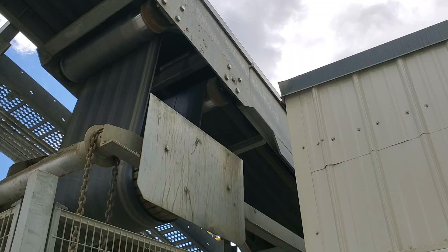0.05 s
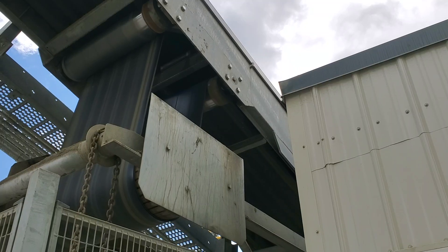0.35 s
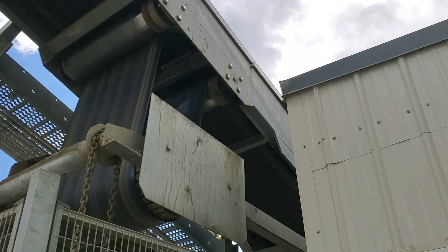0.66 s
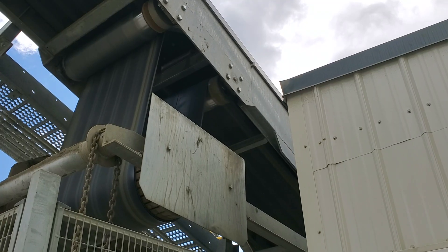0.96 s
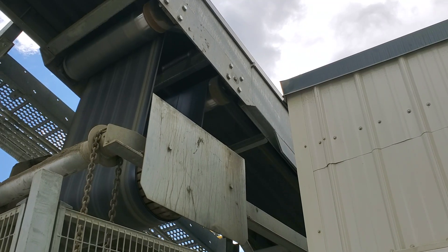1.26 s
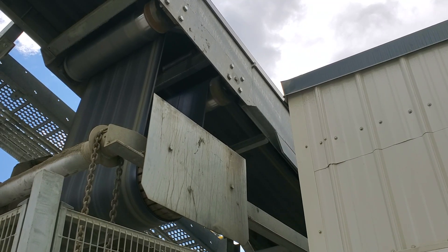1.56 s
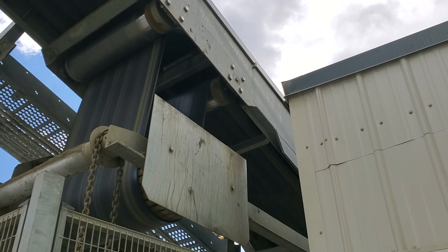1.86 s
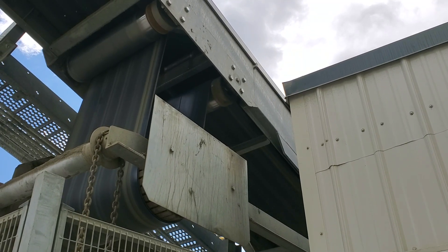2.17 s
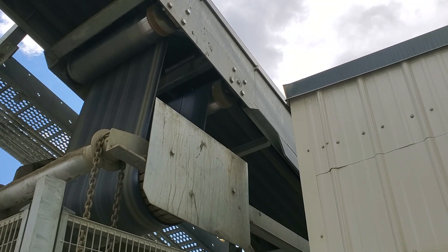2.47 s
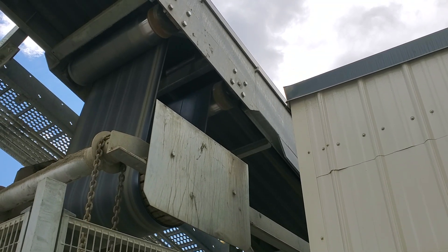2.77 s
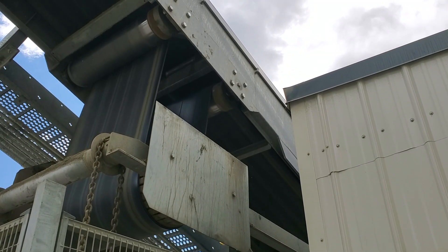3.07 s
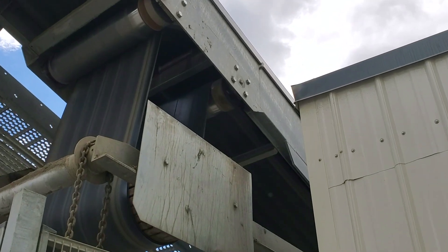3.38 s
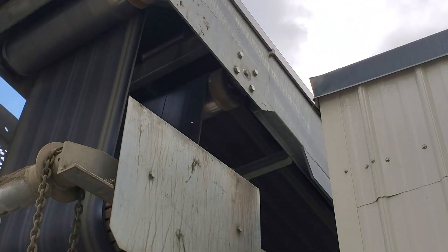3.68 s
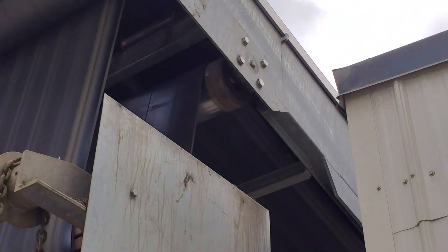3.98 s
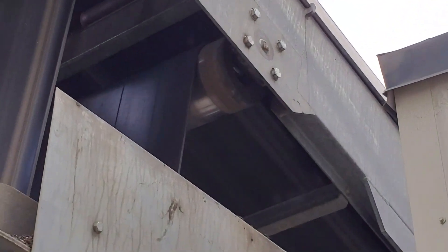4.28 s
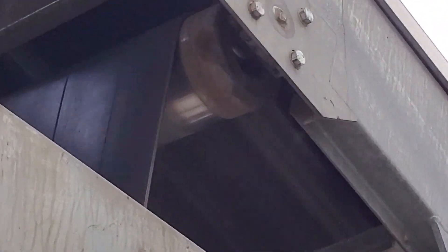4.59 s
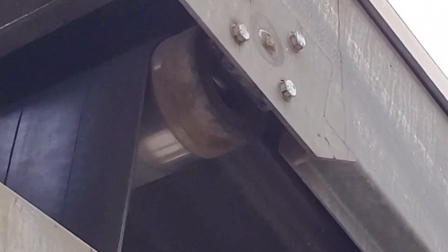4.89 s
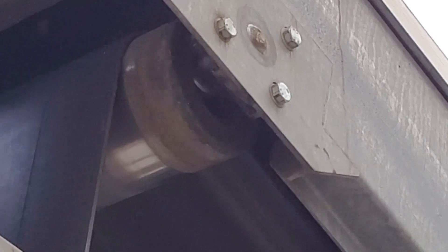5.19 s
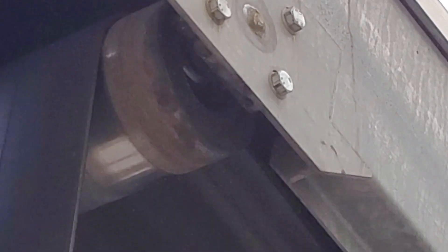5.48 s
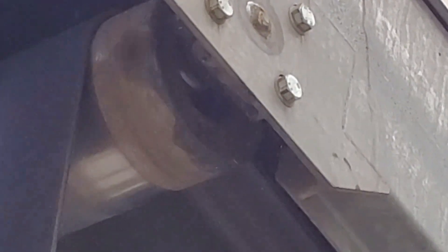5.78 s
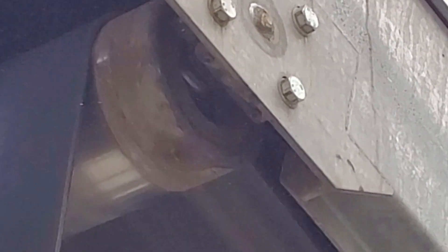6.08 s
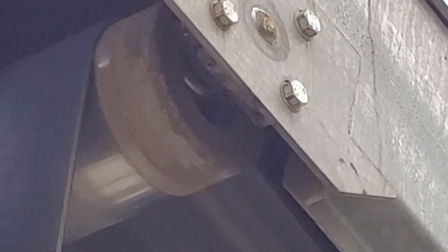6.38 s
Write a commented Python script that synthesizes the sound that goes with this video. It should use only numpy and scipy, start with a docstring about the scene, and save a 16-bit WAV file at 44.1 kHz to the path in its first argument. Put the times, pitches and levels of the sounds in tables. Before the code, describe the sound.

A belt conveyor runs outdoors, heard from below its steel frame for about six and a half seconds. The rolling belt makes a steady low rumble, and a loose shaft adds a deep, uneven throb. Over this, a worn pulley bearing knocks in a quick repeating pattern, making the steelwork rattle and ring. The machine is a little softer during the first second, then builds, with harder knocks around 1.6 to 3 seconds and again from about 4 to 5.4 seconds. A short, bright hiss swells at 2.2 seconds and fades by about 2.7. The dry bearing gives faint, very short high squeaks near 0.7 seconds, between 1.4 and 1.8, at 4.2, and from 5.4 to 5.8. A slight rasp and a thin, high drive whine stay in the background. The rumbling and rattling continue to the end.

```python
"""Outdoors, below the steel frame of a belt conveyor that runs on a worn pulley bearing.
The loose shaft throbs in the frame's low resonance, and four worn spots knock in every turn,
exciting the modes of the steelwork. The dry bearing chirps by stick-slip friction and rasps
faintly. Behind it the belt rolls, the drive whines, and one short gush of hiss passes."""
import sys
import numpy as np
from scipy import signal
from scipy.fft import rfft, irfft
from scipy.io import wavfile

SR = 44100
rng = np.random.default_rng(int(sys.argv[2]) if len(sys.argv) > 2 else 0)


def materialize(psi):
    """Save the field psi as 16-bit PCM at rate SR to the path in sys.argv[1].

    A 1-D psi becomes a single channel; in a 2-D psi each row is a channel.
    """
    bounded = np.clip(np.atleast_2d(psi).T, -1, 1)
    quanta = np.round(bounded * 32767).astype(np.int16)
    wavfile.write(sys.argv[1], SR, quanta)


N = 284004
T = np.arange(N) / SR
HZ = np.fft.rfftfreq(N, 1 / SR)
TURN_HZ = 3.365  # rotation rate of the pulley

# load on the belt: time_s, gain_db
BELT_LOAD = [(0, -1.5), (.25, -8), (.68, -8), (1, -4.5), (1.12, -0.5), (1.35, 0.5), (1.7, 1.5), (2.05, 0.5),
             (2.4, 0), (2.7, .5), (3.2, -0.5), (3.6, 1.9), (3.87, -.5), (4.2, 2), (4.9, 0.1), (5.3, 1.5),
             (5.75, -1.2), (6.44, 1.9)]
# spectrum of the rolling belt and idlers: frequency_hz, density_db
BELT_SPECTRUM = [(20, -25), (45, 0.5), (65, -4.5), (88, 8.5), (125, 9.5), (160, 3.5), (270, -1.5),
                 (600, -6), (1400, -14), (4000, -18.5), (5700, -23), (6800, -19), (7900, -30),
                 (12500, -26.5), (16000, -37)]
# envelope of the gush: time_s, level_db
GUSH_ENVELOPE = [(2.19, -85), (2.198, -29), (2.26, -28.5), (2.31, -22.5), (2.38, -20), (2.5, -26),
                 (2.6, -32.5), (2.9, -85)]
# spectrum of the gush: frequency_hz, density_db
GUSH_SPECTRUM = [(1000, -14), (3000, -8), (4800, -3.5), (6700, -0.5), (8000, -9), (12500, -9.5),
                 (14000, -17), (16000, -23)]
# the two tones of the drive: pitch_hz
WHINE_TONES = (3865, 4134)
# scraping of the dry bearing: time_s, relative_level_db, pitch_hz
RASP_TRACK = [(0, -68, 5060), (.9, -69, 5180), (1.6, -51, 5220), (2.2, -41, 4950), (3.2, -50, 5164),
              (3.7, -45, 5100), (4.8, -55, 4996), (5.75, -39.5, 4845), (6.1, -58, 4907)]
# chirps of the dry bearing: start_s, length_s, pitch_hz, relative_level_db
BEARING_SQUEAKS = [(0.637, .028, 5140, -41), (.691, 0.024, 5100, -33), (.72, .055, 5120, -40),
                   (1.415, .047, 5120, -36), (1.516, 0.033, 5180, -30), (1.785, .033, 5035, -28),
                   (4.164, 0.023, 4860, -22.5), (5.355, 0.031, 4860, -29), (5.378, 0.068, 5000, -38),
                   (5.722, 0.029, 4805, -26.5), (5.813, .035, 4920, -26)]
# big heaves of the shaft against the frame: peak_s, relative_level_db, pitch_hz
SHAFT_HEAVES = [(0.219, -24, 114), (.495, -16, 109.5), (1.1, -18.5, 114), (1.339, -16.5, 123.8),
                (1.503, -16.5, 102.6), (1.654, -10.5, 119.5), (1.726, -10.5, 118.2), (1.921, -13, 107),
                (2.308, -12, 108), (2.401, -5.5, 116), (2.488, -7.5, 113.9), (2.66, -15.5, 101.5),
                (3.139, -13, 109.1), (3.467, -8.5, 110.8), (3.601, -7.5, 114.5), (3.666, -17, 115.8),
                (3.887, -10, 115.9), (4.21, -12.5, 119.7), (4.29, -17.5, 109.6), (4.367, -10.5, 108.5),
                (4.785, -6, 111.6), (4.847, -10.5, 114.6), (5.088, -10.5, 110), (5.205, -8.5, 111.4),
                (5.4, -9.5, 116.4), (5.976, -8.5, 111.1), (6.242, -12.5, 110), (6.386, -8.5, 116.6)]
# resonances of the frame, standing on its broad response: frequency_hz, width_hz, height_db
FRAME_MODES = [(225.6, 4.15, 8.5), (356.4, 8.3, 9.5), (411.9, 12, 6.5), (460, 15.8, 12),
               (580.3, 32.7, 14.5), (647.6, 8.2, 13), (732, 30, 4), (879, 9.3, 16), (928, 26, 11.5),
               (1046, 32, 5), (1167, 24.4, 18.5), (1239, 96, 8), (1884, 14.3, 12.5), (1950, 92, 6),
               (2433, 67, 15), (3134, 113, 11), (3406, 95, 10.5), (4800, 120, 2)]
# broad response of the frame: frequency_hz, gain_db
FRAME_SLOPE = [(60, -25.5), (150, 2.5), (250, -4), (500, -1), (700, -4), (790, -9), (1050, -4),
               (1400, -14.5), (1800, -10), (2700, -18), (3900, -16.5), (5700, -20.5), (6800, -18.5),
               (7900, -34.5), (12500, -29), (16000, -48)]
# the frame's low (thud), middle (ring) and high (clang) bands of modes:
# low_hz, high_hz, idle_db, trim_db, blows_per_s, t60_s, decay_ratio
MODE_BANDS = [(128, 780, -26.5, 0, 1200, 0.062, 1), (894, 1465, -39, -2, 1000, 0.05, 0.89),
              (1450, 13000, -44, 2.1, 1000, 0.058, 0.96)]
# worn spots, before the load acts: offset_in_turn_s, thud_db, ring_db, clang_db, rise_s, decay_s
WORN_SPOTS = [(.067, -28.5, -23, -29, 0.013, 0.038), (0.12, -20, -24.5, -27.5, 0.022, 0.042),
              (.197, -16.5, -22.5, -26.5, 0.019, 0.047), (.294, -21.5, -28, -29, .024, .044)]
# hard knocks, each replacing the ordinary one near it: time_s, thud_db, ring_db, clang_db
HEAVY_KNOCKS = [(.2, -27, -21.5, -28.5), (.364, -23, -28, -29), (0.422, -25, -21, -29),
                (0.889, -22, -22.5, -31.5), (1.298, -20, -17, -21.5), (1.548, -29, -16, -21.5),
                (1.609, -10.5, -14.5, -17.5), (1.691, -11.5, -17, -19.5), (1.787, -12, -19, -22),
                (1.855, -26, -16.5, -25.5), (2.2, -16.5, -18.5, -22), (2.279, -15.5, -20.5, -22),
                (2.385, -17, -17, -24.5), (2.487, -15, -19.5, -21.5), (2.579, -11.5, -22, -20),
                (2.738, -20, -15.5, -26), (2.796, -17, -14, -18.5), (2.978, -12, -22, -20),
                (3.27, -16.5, -18.5, -21.5), (3.681, -14, -29, -21), (3.924, -26, -13, -25),
                (3.983, -16, -13, -18), (4.167, -11, -16, -18), (4.23, -25, -35, -23),
                (4.363, -18.5, -14.5, -21.5), (4.453, -14.5, -16.5, -20.5), (4.576, -15.5, -20, -22),
                (4.656, -16.5, -14.5, -26), (4.76, -9, -19, -23), (4.871, -30, -18.5, -27),
                (5.055, -14, -18, -19), (5.12, -15.5, -12, -23.5), (5.174, -17, -10.5, -17.5),
                (5.25, -15, -17.5, -22), (5.353, -13.5, -22, -22), (5.835, -17, -18, -27),
                (5.94, -14.5, -19.5, -23), (6.242, -15, -14.5, -20), (6.303, -29, -18.5, -26),
                (6.363, -20.5, -16.5, -19.5)]
# coherence of left and right: frequency_hz, shared_power_ratio
COHERENCE = [(25, .93), (60, .985), (130, .985), (290, .87), (640, .76), (1400, .5), (3100, .38),
             (6800, .1), (15000, .05)]
# level difference between the sides: frequency_hz, left_minus_right_db
BALANCE = [(100, 0.69), (400, 0.22), (1200, 2.4), (2400, 2.1), (4400, 3.2), (8000, 3.2), (12000, 9.5),
           (16000, 11)]


def amp(db):
    """Amplitude grows tenfold for every 20 decibels."""
    return 10 ** (np.asarray(db) / 20)


def unit(x):
    """Normalisation to an rms of 1."""
    return x / np.sqrt(np.mean(x ** 2) + 1e-20)


def spectrum_at(points, hz):
    """Interpolation of a spectrum on a logarithmic frequency axis."""
    frequency, value = np.transpose(points)
    return np.interp(np.log(hz + 1), np.log(frequency + 1), value)


def curve(rows, column=1):
    """Linear interpolation of one column of a time table at every sample."""
    rows = np.array(rows)
    return np.interp(T, rows[:, 0], rows[:, column])


def add(mix, start_s, sound):
    """Superposition: a sound adds to the mix from start_s on."""
    part = mix[max(round(start_s * SR), 0):][:len(sound)]
    part += sound[:len(part)]


def wander(hz):
    """Random fluctuation: low-pass Gaussian noise of rms 1 and a bandwidth of about hz."""
    return unit(irfft(rfft(rng.standard_normal(N)) * np.exp(-(HZ / hz) ** 2), N))


def stereo_pair(spectra, hz):
    """Partial coherence: one shared and two independent spectra blend into left and right."""
    shared = np.clip(spectrum_at(COHERENCE, hz), 0, 1)
    return np.sqrt(shared) * spectra[0] + np.sqrt(1 - shared) * spectra[1:]


def noise(colour):
    """Spectral shaping: white noise is filtered into coloured stereo noise of rms 1."""
    white = stereo_pair(rfft(rng.standard_normal((3, N))), HZ)
    return unit(irfft(white * amp(spectrum_at(colour, HZ)), N))


def belt(load, level_db=-21, flutter_db=0.65):
    """Rolling noise: the belt crosses its idlers with a low roar and a fine hiss."""
    return amp(level_db + flutter_db * wander(21)) * load * noise(BELT_SPECTRUM)


def gush(flutter_db=0.2, pan_db=1):
    """Amplitude-modulated noise: a brief bright hiss swells and fades."""
    envelope = amp(curve(GUSH_ENVELOPE) - flutter_db * wander(54.6))
    return envelope * noise(GUSH_SPECTRUM) * amp([[-pan_db], [pan_db]])


def drive_whine(load, level_db=-46, drift_hz=1.27, flutter_db=3.5):
    """Tonal machine noise: two thin spectral lines from the motor drive grow with the load."""
    tones = 0
    for hz in WHINE_TONES:
        flutter = amp(flutter_db * wander(6))
        phase = 2 * np.pi * np.cumsum(hz + drift_hz * wander(9)) / SR
        tones += flutter * np.sin(phase)
    return amp(level_db) * load * tones


def bearing_rasp(level_db=1, drift_hz=50, width_hz=110, flutter_db=3):
    """Friction noise: scraping drives a high mode as a narrow band, without locking into a tone."""
    phase = 2 * np.pi * np.cumsum(curve(RASP_TRACK, column=2) + drift_hz * wander(14)) / SR
    scrape = wander(width_hz) * np.cos(phase) + wander(width_hz) * np.sin(phase)
    return amp(level_db + curve(RASP_TRACK) + flutter_db * wander(31.5)) * scrape


def bearing_squeaks(level_db=-1, sag_hz_per_s=2000, jitter=0.0083, echo_db=-9, echo_s=0.024):
    """Stick-slip excites the same high mode in unsteady, falling chirps; a wall reflects them."""
    out = np.zeros(N)
    waver = 1 + jitter * wander(250)
    for start_s, length_s, pitch_hz, db in BEARING_SQUEAKS:
        n = round(length_s * SR)
        hz = (pitch_hz - sag_hz_per_s * (T[:n] - length_s / 2)) * waver[round(start_s * SR):][:n]
        chirp = amp(db) * np.sqrt(2 * np.hanning(n)) * np.sin(2 * np.pi * np.cumsum(hz) / SR)
        add(out, start_s, chirp)
        add(out, start_s + echo_s, amp(echo_db) * chirp)
    return amp(level_db) * out


def shaft_throb(load, level_db=-5, idle_db=-20, idle_hz=109, swell_db=2, heave_s=0.0898,
                beat_depth=0.073, wobble=0.02763):
    """Forced resonance: each heave of the shaft swells the frame's low mode and pulls its pitch."""
    power = (load * amp(idle_db + swell_db * wander(11))) ** 2
    pull = np.zeros(N)
    heave = np.hanning(round(heave_s * SR)) ** 2
    for peak_s, db, hz in SHAFT_HEAVES:
        heave_power = amp(db) ** 2 * heave
        add(power, peak_s - heave_s / 2, heave_power)
        add(pull, peak_s - heave_s / 2, heave_power * (hz - idle_hz))
    pitch_hz = (idle_hz + pull / power) * (1 + wobble * wander(30))
    phase = 2 * np.pi * np.cumsum(pitch_hz) / SR
    swing = np.sin(phase) + beat_depth * wander(42) * np.cos(phase)
    return amp(level_db) * np.sqrt(2 * power) * swing


def frame_response():
    """Modal response of the steelwork: narrow resonances stand on a broad slope."""
    peaks = sum((amp(db) ** 2 - 1) / (1 + (2 * (HZ - hz) / width_hz) ** 2) ** 1.4
                for hz, width_hz, db in FRAME_MODES)
    log_gain = np.log(amp(spectrum_at(FRAME_SLOPE, HZ))) + np.log(np.maximum(1 + peaks, .1)) / 2
    # minimum phase, so that the ringing follows the blow
    cepstrum = irfft(log_gain, N)
    cepstrum[1:N // 2] *= 2
    cepstrum[N // 2 + 1:] = 0
    return np.exp(rfft(cepstrum))


def pathway(t60_s, direct=0.72):
    """Scattering: a direct arrival and a diffuse stereo tail smear a blow but hardly colour it."""
    t = T[:4096]
    arrivals = rng.standard_normal((3, len(t))) * amp(-60 * t / t60_s)
    arrivals /= np.linalg.norm(arrivals, axis=1, keepdims=True)
    arrivals[0, 0] += direct
    spectra = stereo_pair(rfft(arrivals), np.fft.rfftfreq(len(t), 1 / SR))
    flattened = spectra / abs(spectra) ** (2 / 3)
    paths = irfft(flattened) * (1 - t / t[-1])
    return paths / np.linalg.norm(paths, axis=1, keepdims=True)


def impact_spectrum(force, strikes, blows_per_s, t60_s, spread_db=2.5, shift_db=1.13, places=5):
    """Shot noise: tiny blows and hard strikes land at several places on the bearing, each with a path."""
    sizes = amp(spread_db * np.clip(rng.standard_normal(N), -2, 2)) * rng.choice([-1, 1], N)
    blows = force * unit(sizes * (rng.random(N) < blows_per_s / SR)) + strikes
    place = rng.integers(0, places, N)
    out = 0
    for k in range(places):
        shifts = amp(shift_db * rng.standard_normal(80))
        share = unit(np.interp(T, np.linspace(0, T[-1], 80), shifts))
        local_blows = blows * share * (place == k)
        out += signal.oaconvolve(local_blows[None], pathway(t60_s), axes=1)[:, :N]
    return rfft(out)


def knocks(near_s=.03):
    """Periodic impact: each worn spot knocks once a turn, scaled by the load or as a listed hard knock."""
    rows = []
    for turn in range(int(T[-1] * TURN_HZ) + 1):
        for offset_s, *levels_db, rise_s, decay_s in WORN_SPOTS:
            time_s = turn / TURN_HZ + offset_s
            loaded_db = np.array(levels_db) + np.interp(time_s, *np.transpose(BELT_LOAD))
            heavy = [knock for knock in HEAVY_KNOCKS if abs(knock[0] - time_s) < near_s]
            knock = heavy[0] if heavy else (time_s, *loaded_db)
            rows.append((*knock, rise_s, decay_s))
    return rows


def bearing_rattle(load, lead_s=0.0029, strike_s=0.0018, abrupt_s=0.033):
    """Impact excitation: each knock is a burst of chatter that rings three bands of the frame's modes."""
    frame, bursts = frame_response(), knocks()
    t, impulse = T[:SR * 2 // 3], T[:8192] == 0
    out = 0
    for band, (low_hz, high_hz, idle_db, trim_db, blows_per_s, t60_s, decay_ratio) in enumerate(MODE_BANDS):
        power = (load * amp(idle_db)) ** 2
        strikes = np.zeros(N)
        for time_s, *levels_db, rise_s, decay_s in bursts:
            strength = amp(levels_db[band])
            swell = np.minimum(t / rise_s, 1)
            fade = np.exp(-np.maximum(t - rise_s, 0) / (decay_ratio * decay_s))
            add(power, time_s - rise_s / 2 - lead_s, (strength * swell * fade) ** 2)
            # one hard strike per burst, the stronger the more abrupt the rise
            add(strikes, time_s, [strength * np.sqrt(strike_s * SR * np.exp(-rise_s / abrupt_s))])
        highpass = signal.butter(5, low_hz, "high", fs=SR, output="sos")
        lowpass = signal.butter(5, high_hz, "low", fs=SR, output="sos")
        modes = frame * rfft(signal.sosfilt(np.vstack([highpass, lowpass]), impulse), N)
        modes /= np.sqrt(np.mean(abs(modes) ** 2))
        out += amp(trim_db) * modes * impact_spectrum(np.sqrt(power), strikes, blows_per_s, t60_s)
    return irfft(out, N)


def scene():
    """Superposition of all sources; one load modulates the rattle, throb, belt and whine together."""
    load = amp(curve(BELT_LOAD))
    return (bearing_rattle(load) + shaft_throb(load) + belt(load)
            + bearing_squeaks() + bearing_rasp() + drive_whine(load) + gush())


def record(dry, lag_s=.000045, onset_s=.111, cutoff_hz=15850):
    """Level and time differences: the right side is duller and later; peaks and bandwidth are limited."""
    tilt_db = spectrum_at(BALANCE, HZ)
    delay = np.exp(-2j * np.pi * HZ * lag_s)
    sides = np.array([amp(tilt_db / 2), amp(-tilt_db / 2) * delay])
    sides /= np.sqrt(np.mean(abs(sides) ** 2, axis=0))
    onset = np.clip((T - onset_s) / .002, 0, 1)  # silence, then a 2 ms rise
    heard = irfft(rfft(dry) * sides, N) * onset
    saturated = heard / (1 + heard ** 8) ** (1 / 8)
    lowpass = signal.firwin(511, cutoff_hz, window=("kaiser", 9), fs=SR)
    return signal.oaconvolve(saturated, lowpass[None], "same")


dry = scene()
out = record(dry)
materialize(out)
```